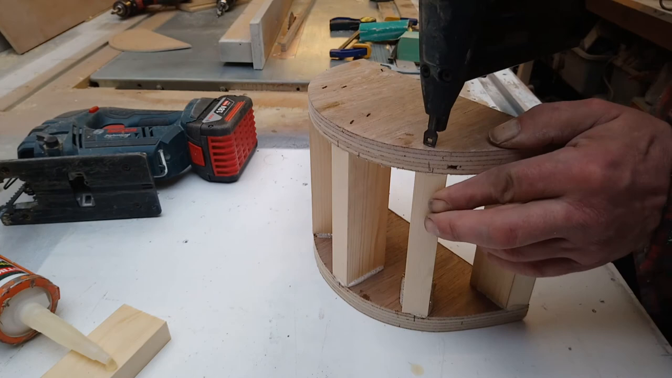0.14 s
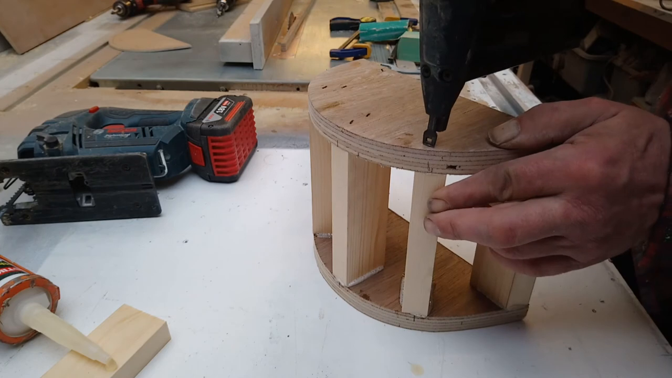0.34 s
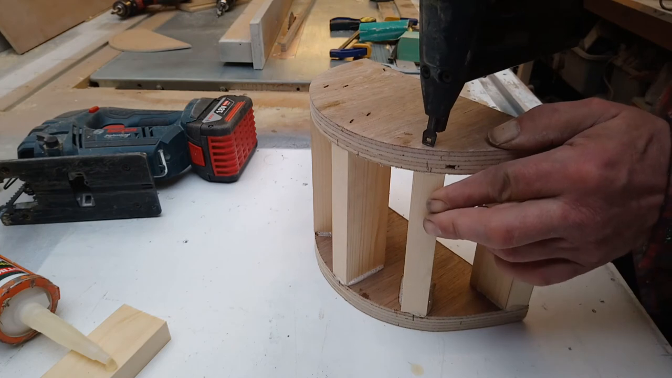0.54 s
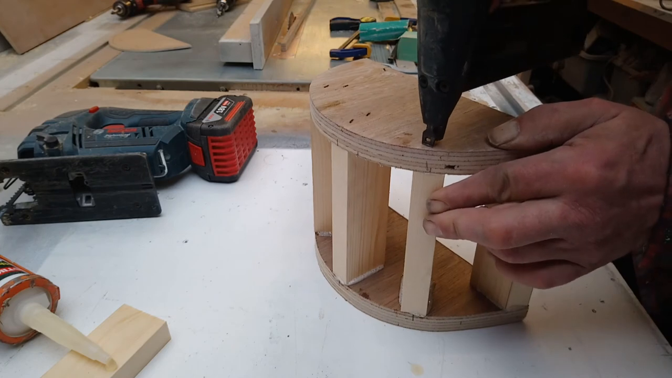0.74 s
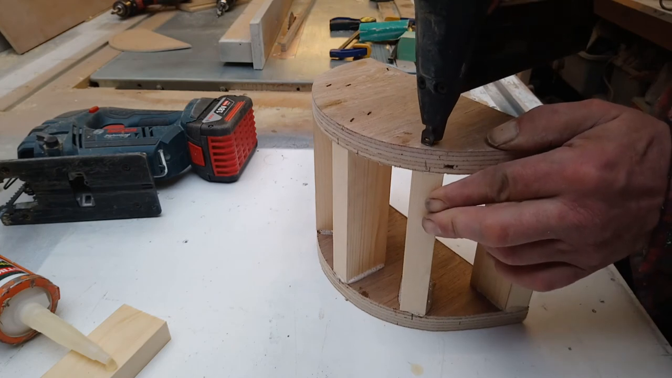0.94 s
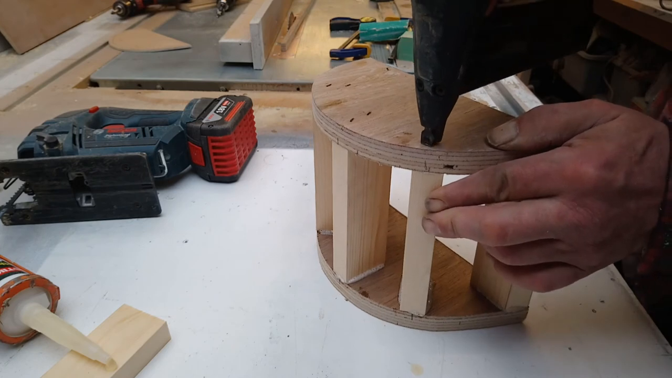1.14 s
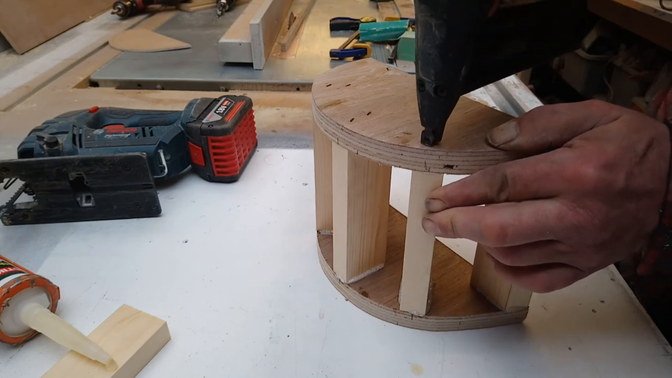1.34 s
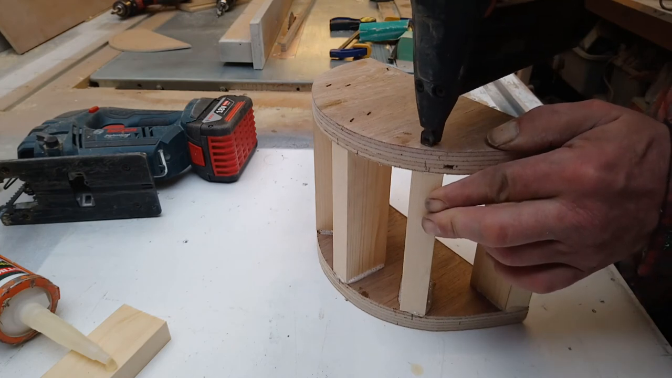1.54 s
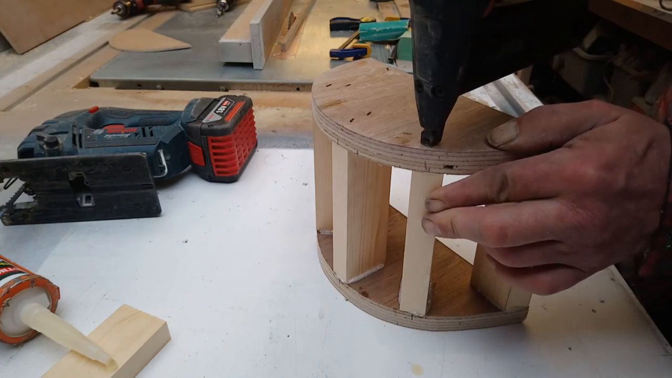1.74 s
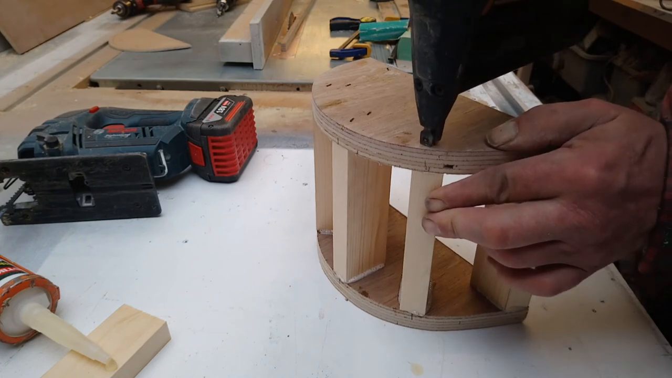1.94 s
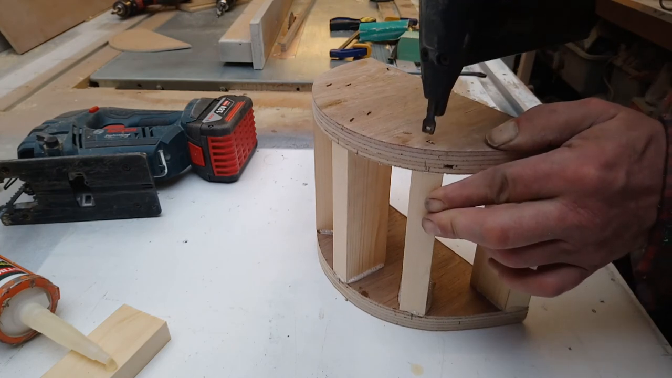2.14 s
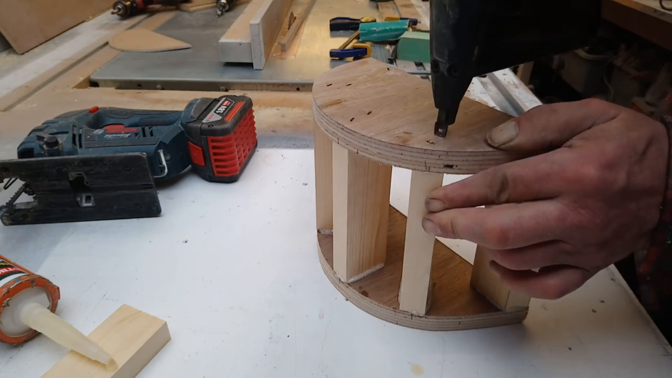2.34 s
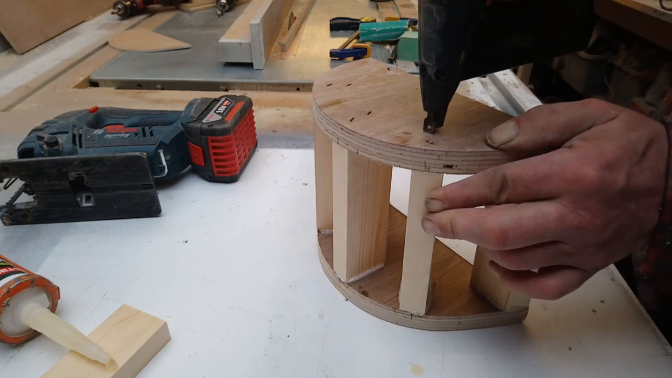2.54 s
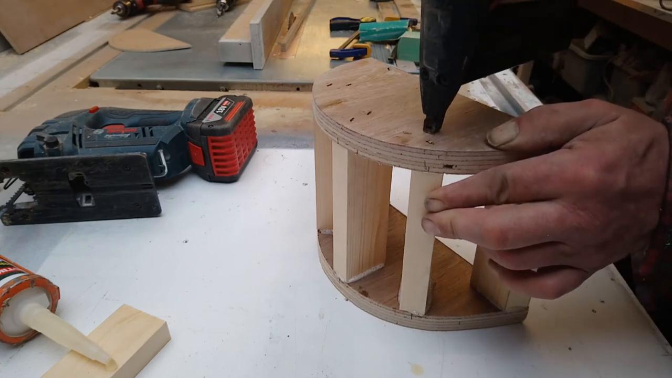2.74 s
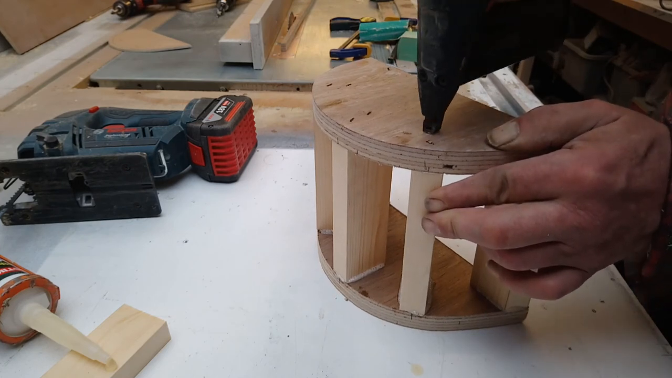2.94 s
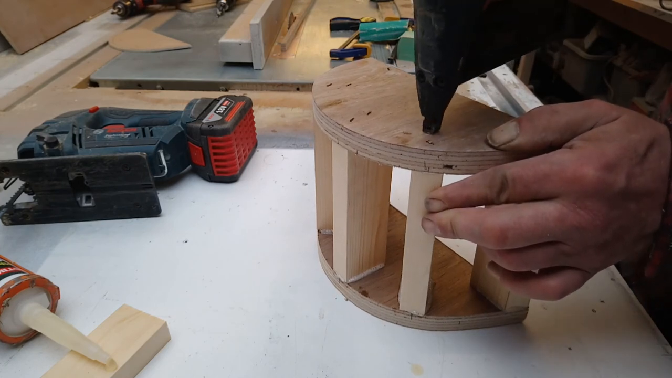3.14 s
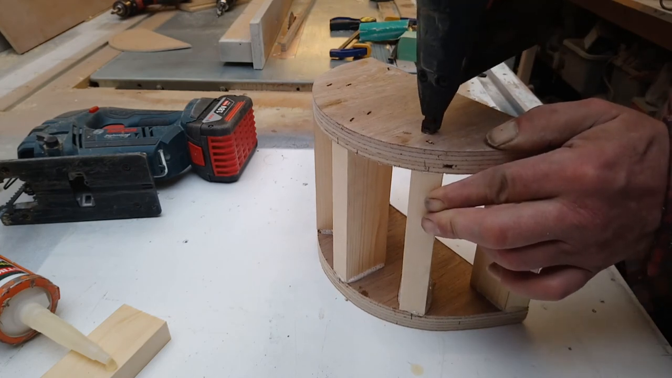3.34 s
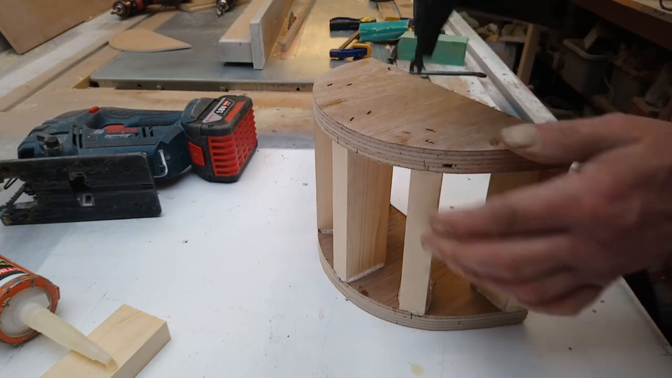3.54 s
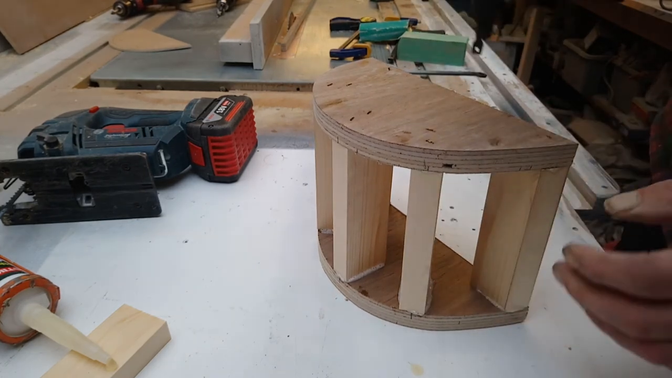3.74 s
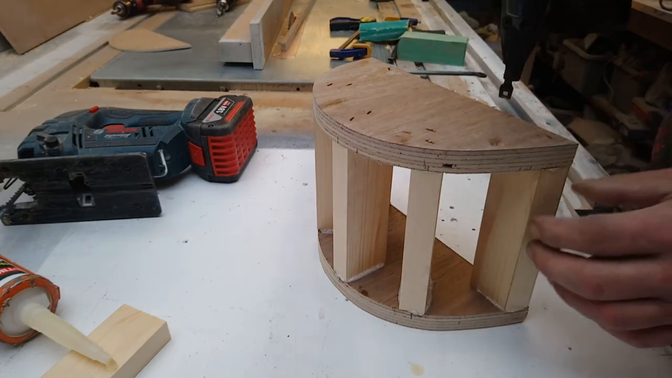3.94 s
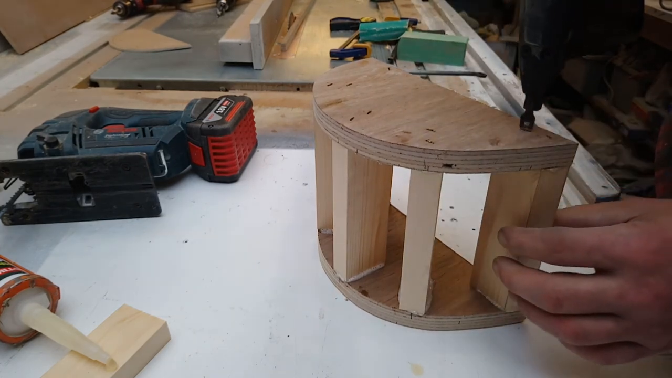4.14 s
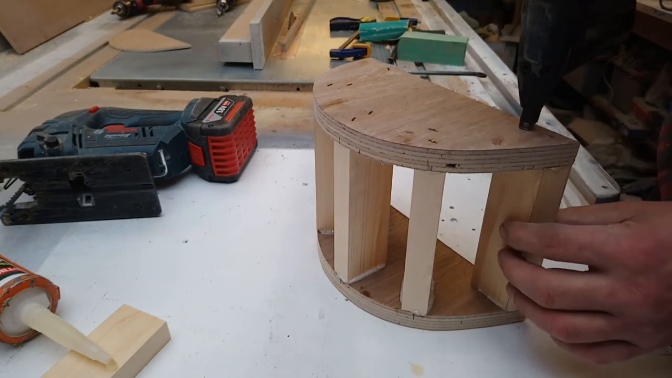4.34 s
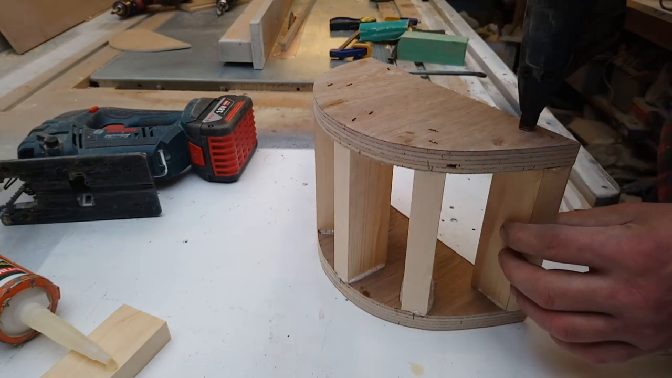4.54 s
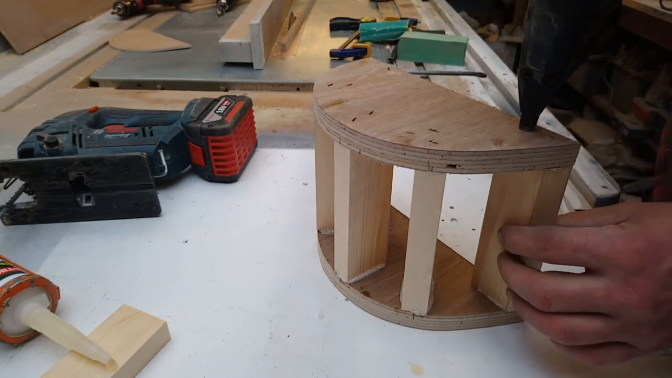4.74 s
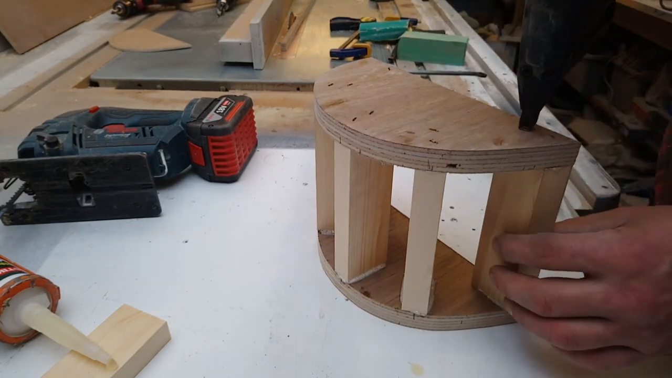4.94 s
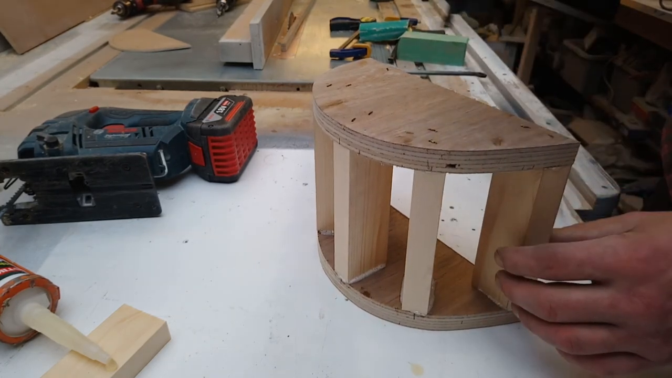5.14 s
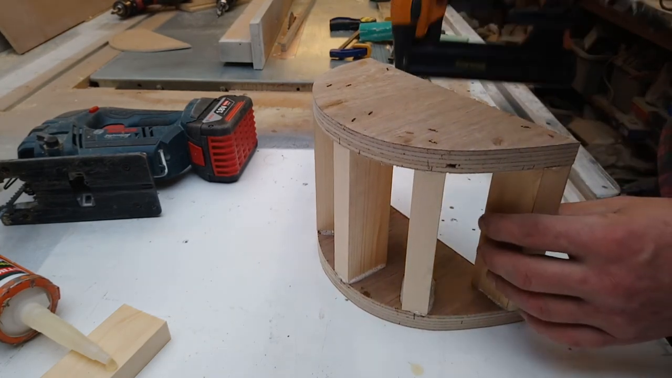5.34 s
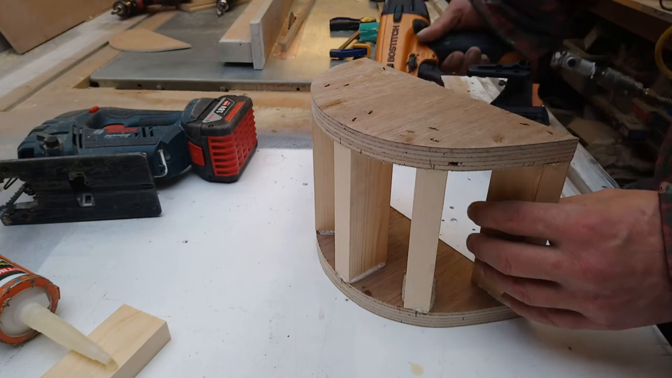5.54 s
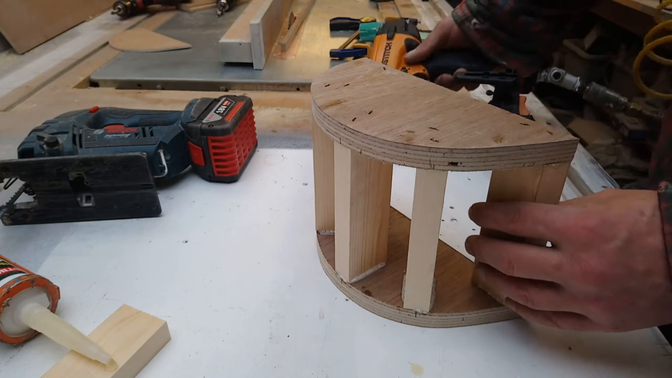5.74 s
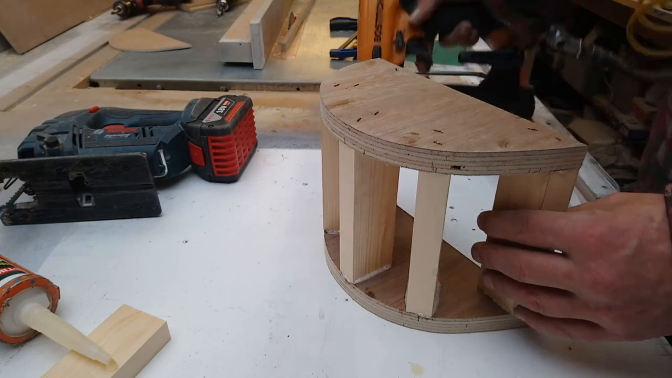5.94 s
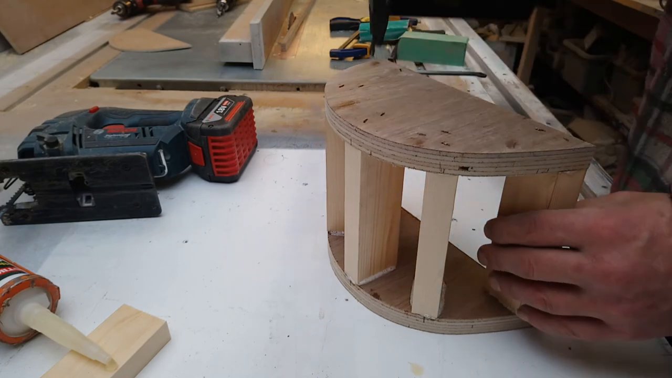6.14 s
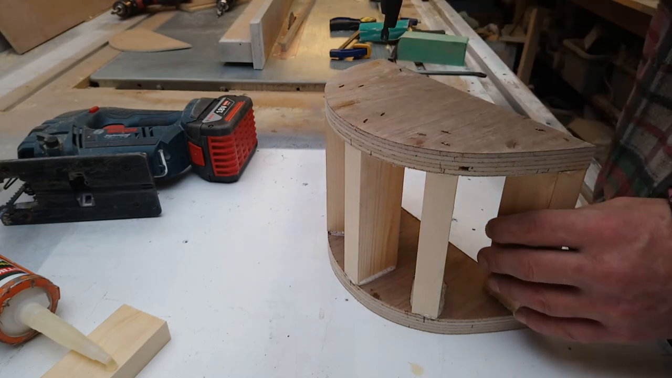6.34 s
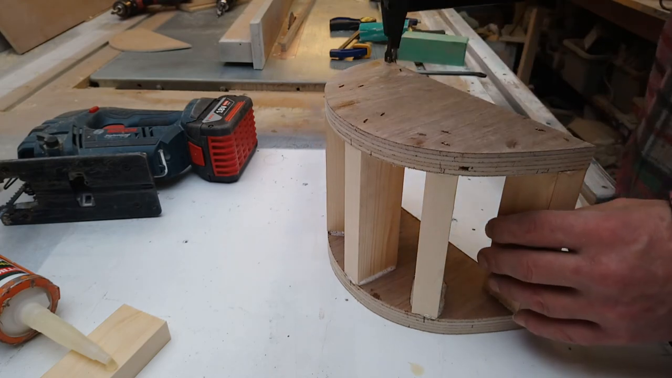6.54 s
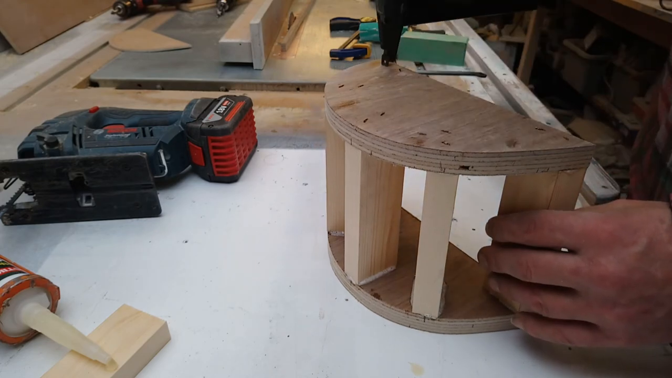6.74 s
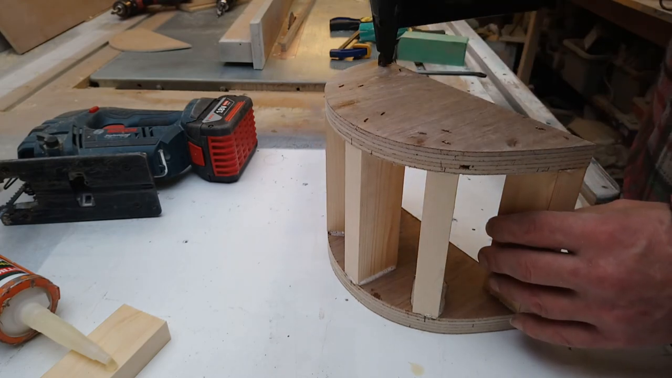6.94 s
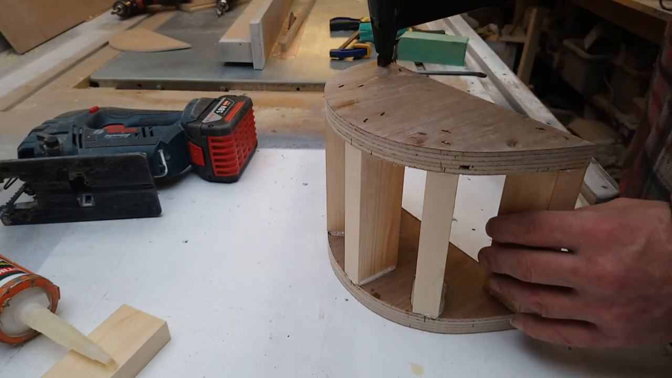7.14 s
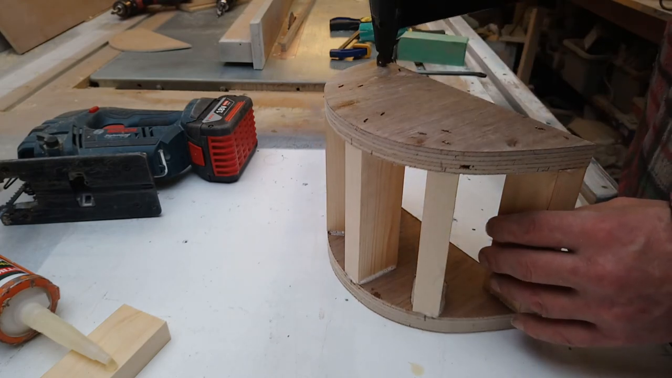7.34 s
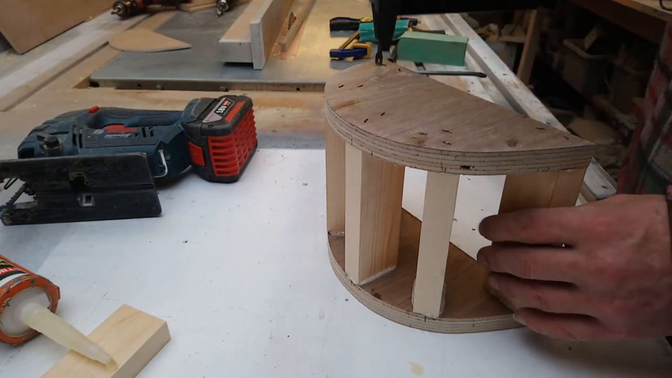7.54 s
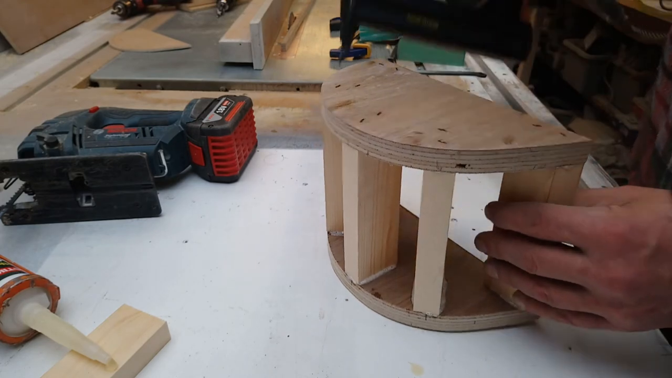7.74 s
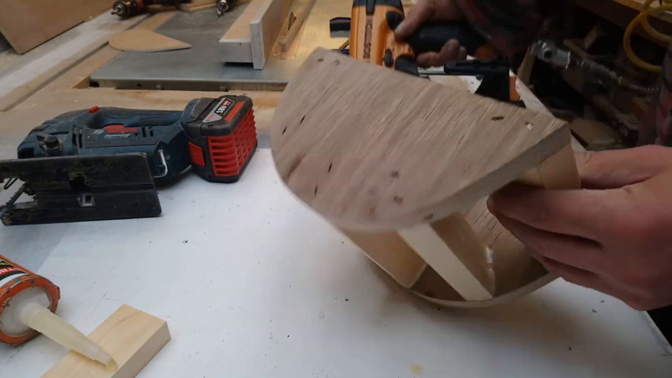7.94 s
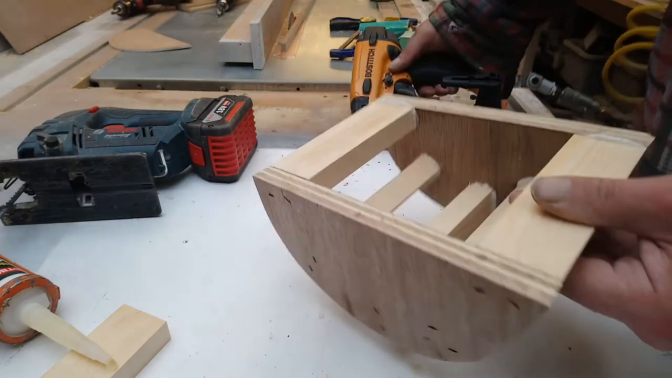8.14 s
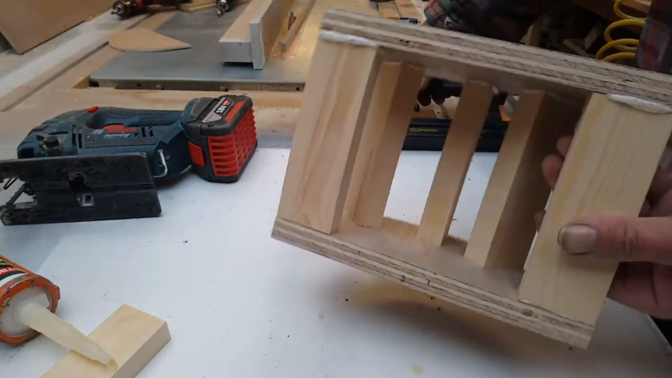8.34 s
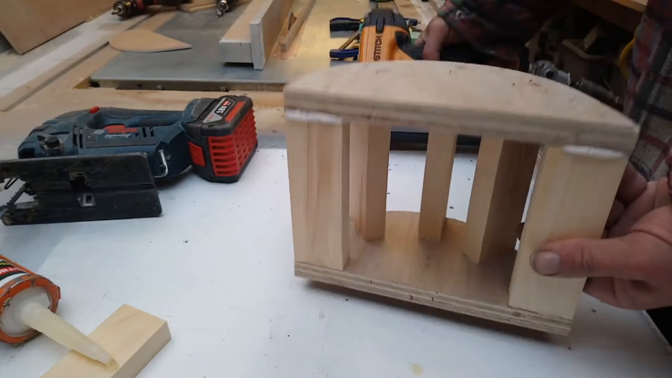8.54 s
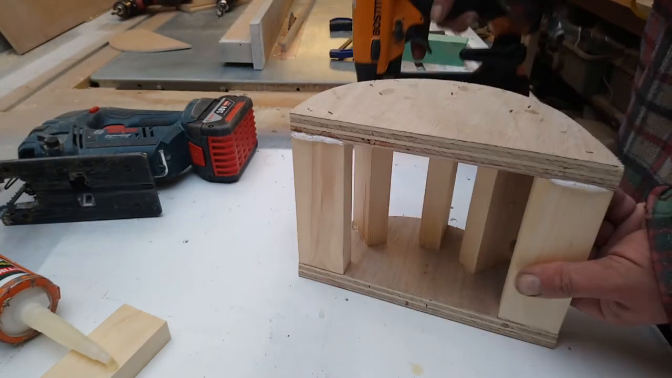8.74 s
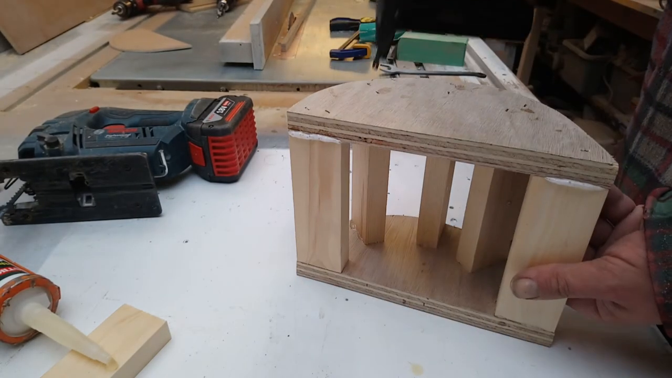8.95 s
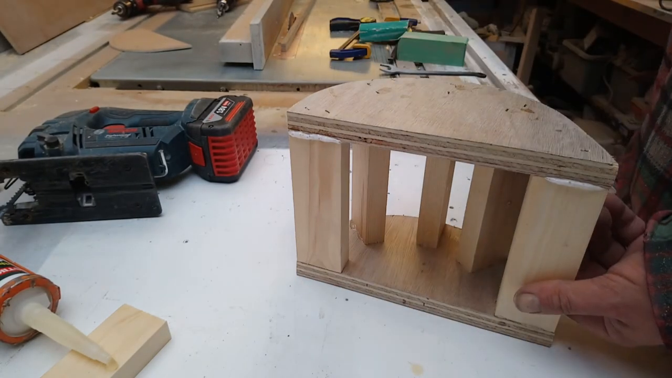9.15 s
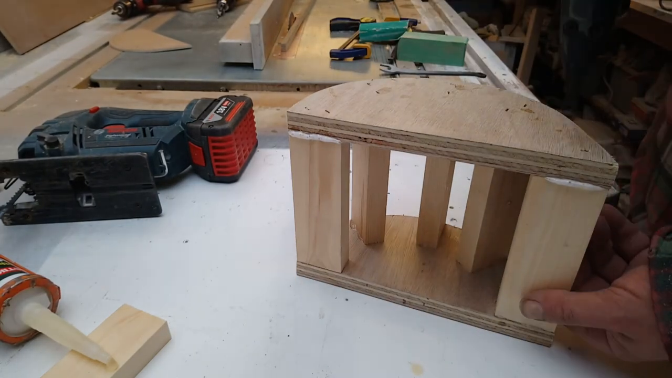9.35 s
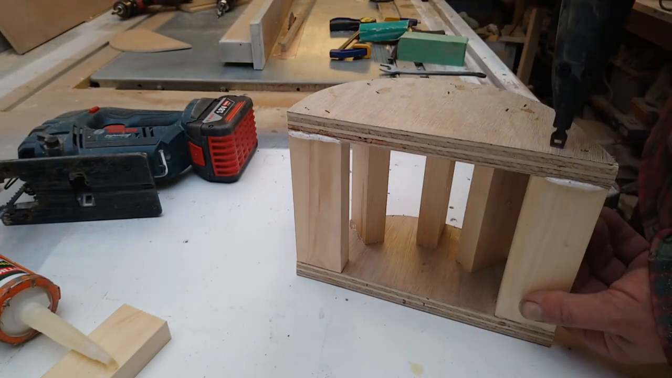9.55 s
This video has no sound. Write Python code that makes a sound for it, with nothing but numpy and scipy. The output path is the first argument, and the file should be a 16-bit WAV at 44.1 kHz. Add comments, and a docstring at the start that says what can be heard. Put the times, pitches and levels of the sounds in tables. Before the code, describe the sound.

In a small workshop, four punchy stapler blasts each snap back with a short air hiss, while the wooden form is handled and set down.

```python
"""Four loud shots of an air staple gun into a plywood and timber form on a workbench in a small workshop.
Shot: damped air pulse, noise bursts for the driver's blow, form and gun modes; a limiter ducks the level.
Return: the piston slaps back (short pulse, noise) and the exhaust hisses until the cylinder is empty.
Between shots the gun clicks and clacks; the form is knocked, scraped, rocked and set down (noise, modes).
Steady air noise and faint hand rustle lie below. Table levels are relative dB."""
import sys
import numpy as np
from scipy import signal
from scipy.fft import rfft, irfft, next_fast_len
from scipy.io import wavfile
from scipy.ndimage import uniform_filter1d, minimum_filter1d

SR = 44100
rng = np.random.default_rng(int(sys.argv[2]) if len(sys.argv) > 2 else 0)


def output_pcm(signal):
    """Save a mono or channel-first signal as 16-bit PCM at the path in sys.argv[1].

    Samples are clipped to [-1, 1] before scaling.
    """
    pcm = np.clip(np.atleast_2d(signal).T, -1, 1) * 32767
    wavfile.write(sys.argv[1], SR, np.round(pcm).astype(np.int16))


N = 422908
TIME = np.arange(N) / SR
AGE = np.arange(int(.8 * SR)) / SR   # s since onset


def from_db(db):
    """Decibels to gain."""
    return 10 ** (np.asarray(db) / 20)


def rms_one(x):
    """Scale to rms 1."""
    return x / np.sqrt(np.mean(x ** 2) + 1e-20)


def at_hz(points, hz):
    """Interpolate a table on a log-frequency axis."""
    f, value = np.transpose(points)
    return np.interp(np.log(np.maximum(hz, 1)), np.log(f), value)


def noise(spectrum, size=len(AGE)):
    """Gaussian noise shaped by a spectrum, rms 1."""
    n = next_fast_len(size)
    gain = from_db(at_hz(spectrum, np.fft.rfftfreq(n, 1 / SR)))
    white = rfft(rng.standard_normal(n))
    return rms_one(irfft(white * gain, n)[:size])


def fade(t60_s, age=AGE):
    """Exponential decay, -60 dB at t60."""
    return np.exp(-np.log(1000) * age / t60_s)


def attack(rise_s):
    """Exponential approach to full level."""
    return 1 - np.exp(-AGE / rise_s)


def burst(spectrum, t60_s, rise_s):
    """Many close, heavily damped modes set off together, as decaying noise."""
    return noise(spectrum) * fade(t60_s) * attack(rise_s)


def ring(modes, spread_db):
    """Struck modes: decaying sines, new strength and phase at every blow."""
    hz, db, t60_s = np.transpose(modes)[:, :, None]
    strength = from_db(db + spread_db * rng.standard_normal(hz.shape))
    phase = rng.random(hz.shape)   # cycles
    waves = strength * np.sin(2 * np.pi * (hz * AGE + phase)) * fade(t60_s)
    return waves.sum(0) * attack(0.00015)


def pop(hz, length_s):
    """Pressure pulse: a few cycles, then cut off."""
    return np.sin(2 * np.pi * hz * AGE) * np.exp(-np.minimum(AGE / length_s, 2) ** 6)


def swell(start_s, length_s):
    """Speed of a hand movement: half-sine arch from rest to rest."""
    return np.sin(np.pi * np.clip((TIME - start_s) / length_s, 0, 1))


def waver(rate_hz):
    """Random values from -1.12 to 1 at a given rate, joined by straight lines."""
    knots = rng.uniform(-1.12, 1, N)
    return np.interp(TIME * rate_hz, np.arange(N), knots)


def add(track, start_s, sound):
    """Mix a sound into a track at a time."""
    i = max(int(round(start_s * SR)), 0)
    track[i:i + len(sound)] += sound[:max(N - i, 0)]


# shots: t/s, air pulse level/dB, blow level/dB, form ring level/dB
SHOT_EVENTS = [(1.7800, 12, 7, 1.5), (3.1840, 13, 7, 3.5), (4.7752, 9, 3.5, -3.5), (7.2876, 5.5, 2.5, -14)]
# driver blow spectrum: f/Hz, level/dB
BLOW_SPECTRUM = [(40, -32), (80, -8), (140, 6.5), (250, 8), (500, 2), (1000, 0.5), (1600, -1.5), (2500, 1),
                 (4000, -2.5), (6500, -1), (10000, -8.5), (16000, -11.5)]
# gun body modes: f/Hz, level/dB, t60/s
GUN_MODES = [(1304, -11, 0.11), (1571, -9, 0.13), (1983, 6.5, 0.033), (2498, 6.5, 0.058),
             (2873, 2.5, 0.086), (2910, -9.5, .1), (3300, -15, .15), (3700, -18.5, .1), (4360, -18, .09),
             (4640, -6, .09), (5190, -1, 0.052), (6100, -10, 0.088)]
# wooden form modes: f/Hz, level/dB, t60/s
FORM_MODES = [(143, -10, 0.22), (186.8, -6, 0.39), (231.6, -6.5, 0.32), (291, 1, 0.093), (332, -6, 0.26),
              (353, 3.5, 0.32), (423, -5, 0.27), (480, -34, .13), (576, -5, 0.11), (801, -21, 0.19),
              (1085, -25, 0.11), (1090, -22, .15), (1491, -15.5, .14)]
RECOIL_RISE_S, RECOIL_T60_S = 0.0029, 0.054


def shots(pulse_hz, pulse_s, blow_lag_s, crack_db, peak_db, shake_db, form_db, gun_db, push_db, push_hz,
          trigger_db):
    """Air slams the piston down; the driver hits home and shakes the form. Gives (pulses, ringing)."""
    pulses, body = np.zeros(N), np.zeros(N)
    valve = [(4000, -17.0), (6700, -1), (9000, -20.5)]   # f/Hz, level/dB
    for t, pulse_db, blow_db, ring_db in SHOT_EVENTS:
        hit = t + blow_lag_s
        add(pulses, t - .010, from_db(trigger_db) * burst(valve, t60_s=0.019, rise_s=0.00041))
        add(pulses, t, from_db(pulse_db) * pop(pulse_hz, pulse_s))
        add(body, t, from_db(blow_db + crack_db) * burst(BLOW_SPECTRUM, t60_s=0.13, rise_s=0.000087))
        add(body, hit, from_db(blow_db + peak_db) * burst(BLOW_SPECTRUM, t60_s=0.019, rise_s=0.0021))
        add(body, hit, from_db(blow_db + shake_db) * burst(BLOW_SPECTRUM, t60_s=0.12, rise_s=0.00034))
        add(body, hit, from_db(blow_db + gun_db) * ring(GUN_MODES, spread_db=3.0))
        add(pulses, t, from_db(ring_db + form_db) * ring(FORM_MODES, spread_db=2.5))
        # recoil shoves form and bench: one heavily damped swing
        push = np.sin(2 * np.pi * push_hz * AGE) * fade(RECOIL_T60_S) * attack(RECOIL_RISE_S)
        add(body, t, from_db(ring_db + push_db) * push)
    return pulses, body


# trigger let go, piston returns: t/s, slap level/dB, slap f/Hz, exhaust level/dB
RETURN_EVENTS = [(1.9342, 13, 2220, -4.5), (3.3355, 8.5, 2064, -5.5), (4.9070, 6, 2094, -8),
                 (7.4250, 6.5, 2350, -8.5)]
# piston slap spectrum: f/Hz, level/dB
SLAP_SPECTRUM = [(100, -7), (400, 4.5), (1000, 4.5), (1500, 7), (2100, 9.5), (2600, 13), (3400, -12),
                 (5000, 4), (7000, -3.5), (16000, -25)]
# exhaust hiss spectrum: f/Hz, level/dB
EXHAUST_SPECTRUM = [(200, -2), (700, -30), (1400, 3.5), (2200, 4), (3300, 5.5), (5000, 6), (6500, 12),
                    (7500, 10), (10000, 4), (15000, 3)]
# small steel contact spectrum: f/Hz, level/dB
CLICK_SPECTRUM = [(300, -10), (1000, 8.5), (2000, 0), (3500, -0.5), (5500, 1), (7000, 4.5), (10000, -7),
                  (16000, -11.5)]
# body and magazine clack spectrum: f/Hz, level/dB
CLACK_SPECTRUM = [(200, 3), (500, 7), (900, 3.5), (1400, -5.5), (2800, 5.5), (4500, -1.5), (6500, -4),
                  (10000, -13), (16000, -21)]
EXHAUST_S = 0.17   # centre of the closing slope as the cylinder empties


def returns(slap_s, clatter_db, bounce_lag_s, bounce_db, vent_t60_s, close_s):
    """The piston slaps its stop and bounces; the cylinder vents until empty. Gives (pulses, ringing)."""
    pulses, body = np.zeros(N), np.zeros(N)
    for t, slap_db, hz, exhaust_db in RETURN_EVENTS:
        add(pulses, t, from_db(slap_db) * pop(hz, slap_s))
        add(body, t, from_db(slap_db + 1.5) * burst(CLICK_SPECTRUM, t60_s=0.01, rise_s=0.00067))
        add(body, t, from_db(slap_db + clatter_db) * burst(SLAP_SPECTRUM, t60_s=0.12, rise_s=0.0005))
        bounce = burst(CLACK_SPECTRUM, t60_s=0.0048, rise_s=0.00022)
        add(body, t + bounce_lag_s, from_db(slap_db + bounce_db) * bounce)
        emptying = (1 - np.tanh((AGE - EXHAUST_S) / close_s)) / 2
        hiss = burst(EXHAUST_SPECTRUM, t60_s=vent_t60_s, rise_s=0.0098)
        add(body, t, from_db(exhaust_db) * hiss * emptying)
    return pulses, body


# light clicks of the gun's safety: t/s, level/dB, ring f/Hz, ring level above tick/dB
SAFETY_CLICKS = [(0.943, -37, 5660, 15), (2.1861, -22.5, 4520, 4), (2.4398, -28.5, 5740, -4),
                 (2.6522, -37, 6000, 10), (2.7104, -35.5, 2900, 3.5), (2.981, -30.5, 2436, -10),
                 (4.513, -42, 6650, 14.5), (7.152, -34.5, 2550, -1), (7.7045, -32.5, 6600, 3),
                 (8.0725, -30.5, 3300, -10)]
# gun nose set on the plywood: t/s, steel tick level/dB, wood knock level/dB
NOSE_TOUCHES = [(0.6822, -35.5, -48), (2.3224, -35.5, -33.5), (4.142, -22, -33), (4.3251, -29, -35.5),
                (6.546, -19.5, -31), (6.7228, -30.5, -51), (6.789, -33.5, -35), (7.199, -33, -38),
                (9.521, -23, -30)]
# steel nose modes: f/Hz, level/dB, t60/s
NOSE_MODES = [(1800, -12, 0.12), (2840, 1, 0.026), (3450, 0.5, 0.043), (4200, -8, 0.077), (4630, -2, 0.098),
              (5120, 0.5, 0.044), (6450, -4, 0.084)]
# gun body and magazine clacks: t/s, level/dB, ring level/dB, air spit level/dB
BODY_CLACKS = [(1.9810, -21, -43, -41), (5.4370, -17, -23, -50), (5.4950, -31.5, -38, -58),
               (5.5548, -37, -57, -57), (5.8532, -35.5, -66, -27), (7.4725, -20.5, -40, -31),
               (7.9066, -16.5, -21, -38), (8.1460, -22, -36, -15)]
MAGAZINE_RATTLE_S, MAGAZINE_LOSS_DB = 0.015, 8.5   # per repeat strike on the body


def gun_handling(click_db, tick_t60_s, ring_db, ring_t60_s, nose_db, rattle_db, rattle_lag_s, spit_t60_s):
    """Small steel parts tick and rattle; harder jolts ring the gun's body and let out a spit of air."""
    out = np.zeros(N)

    def tick(t, db, ringing):
        """A steel contact with its ring, then a weaker rattle."""
        contact = burst(CLICK_SPECTRUM, t60_s=tick_t60_s, rise_s=0.00067)
        add(out, t, from_db(db + click_db) * (contact + ringing))
        rattle = burst(CLICK_SPECTRUM, t60_s=0.082, rise_s=.0005)
        add(out, t + rattle_lag_s * rng.uniform(0.37, 1.3), from_db(db + rattle_db) * rattle)

    for t, db, hz, share_db in SAFETY_CLICKS:
        steel = [(hz * 0.19, -30), (hz * 0.76, -9), (hz, 0), (hz * 1.16, -9), (hz * 2, -24)]
        tick(t, db, from_db(share_db + ring_db) * burst(steel, t60_s=ring_t60_s, rise_s=0.00033))
    for t, db, _ in NOSE_TOUCHES:
        tick(t, db, from_db(nose_db) * ring(NOSE_MODES, spread_db=-4.0))
    for t, db, body_db, air_db in BODY_CLACKS:
        add(out, t, from_db(db) * burst(CLACK_SPECTRUM, t60_s=0.18, rise_s=0.00086))
        for k in range(3):
            strike = from_db(body_db - k * MAGAZINE_LOSS_DB) * ring(GUN_MODES, spread_db=1.5)
            add(out, t + k * MAGAZINE_RATTLE_S, strike)
        add(out, t, from_db(air_db) * burst(EXHAUST_SPECTRUM, t60_s=spit_t60_s, rise_s=0.00142))
    return out


# hands shift their grip: t/s, length/s, low shuffle level/dB, sleeve rustle level/dB
GRIP_MOVES = [(0.85, 0.39, -42.5, -74), (2.3, 0.45, -37, -42), (3.55, 0.64, -44, -53),
              (5.138, 0.42, -41.5, -50), (5.973, 0.29, -49, -47), (6.59, 0.25, -51, -45),
              (7.64, 0.33, -33.5, -41.5), (8.239, 0.16, -46, -46.5), (9.159, 0.31, -39.5, -52)]
LOOSE_TICKS_PER_S, LOOSE_TICK_DB = 2.6, -33.5   # rate at full hand speed


def loose_parts():
    """Loose gun parts tick at random while the hands move, more often at higher hand speed."""
    moving = sum(swell(t, length_s) for t, length_s, _, _ in GRIP_MOVES)
    happens = rng.random(N) < moving * LOOSE_TICKS_PER_S / SR
    jolts = happens * rng.uniform(0.46, 1, N)
    tick = burst(CLICK_SPECTRUM, t60_s=0.027, rise_s=.0004)
    return from_db(LOOSE_TICK_DB) * signal.fftconvolve(jolts, tick)[:N]


# form knocked or set down: t/s, level/dB, bright edge level/dB
FORM_KNOCKS = [(0.044, -40, 0), (1.192, -36, 1), (1.365, -38.5, 0), (5.436, -21, 3), (7.903, -21, 1.5),
               (8.135, -14, -4.5), (8.5653, -3, -9.5), (8.636, -16, -24), (8.656, -9, -15),
               (8.676, -17, -13)]
# form rocks on the bench: t/s, first thud level/dB, loss per thud/dB
FORM_ROCKS = [(0.684, -26, 10), (1.183, -31.5, 12), (2.652, -29.5, 5), (4.331, -21, 3), (5.457, -21.5, 1.5),
              (6.727, -26, 9), (6.923, -23.5, 8.5), (7.933, -22, 8), (8.133, -11.5, 13.5),
              (8.566, -18, 0.5), (8.673, -15, 11)]
# wood contact spectrum: f/Hz, level/dB
WOOD_SPECTRUM = [(60, -6), (130, -7.5), (190, 10.5), (260, -7), (400, 0.5), (600, 0), (1000, -19.5),
                 (2000, -23), (4000, -42.5), (10000, -57)]
# bright edge of a wood contact: f/Hz, level/dB
WOOD_EDGE_SPECTRUM = [(200, -6.5), (700, 10.5), (1400, 3), (2500, -3.5), (5000, -15.5), (12000, -36)]
# bench thud and hand shuffle spectrum: f/Hz, level/dB
BENCH_SPECTRUM = [(20, -19), (35, -19), (52, -1), (80, 1.5), (120, -2.5), (180, 0.5), (260, -10.5),
                  (450, -18.5), (1200, -45.5)]
TOUCH_EDGE_DB, TOUCH_THUD_DB = 3.5, -4   # re knock
REBOUND_S, REBOUND_LOSS_DB = 0.018, 5   # per rebound, two per form knock
ROCK_S = 0.056   # thud to thud


def form_handling(knock_db, ring_db, bump_db):
    """Wood meets the gun's nose or the bench, which answers with a low thud; the form chatters and rocks."""
    out = np.zeros(N)

    def knock(t, db, edge_db):
        """A hard contact that rings the form."""
        edge = burst(WOOD_EDGE_SPECTRUM, t60_s=0.063, rise_s=0.00081)
        contact = burst(WOOD_SPECTRUM, t60_s=0.085, rise_s=0.00077) + from_db(edge_db) * edge
        ringing = from_db(ring_db) * ring(FORM_MODES, spread_db=4.0)
        add(out, t, from_db(db) * (from_db(knock_db) * contact + ringing))

    def thud(t, db):
        """A soft push into the bench."""
        add(out, t, from_db(db + bump_db) * burst(BENCH_SPECTRUM, t60_s=0.18, rise_s=0.0069))

    for t, _, db in NOSE_TOUCHES:
        knock(t, db, TOUCH_EDGE_DB)
        thud(t, db + TOUCH_THUD_DB)
    for t, db, edge_db in FORM_KNOCKS:
        for k in range(3):
            knock(t + k * REBOUND_S, db - k * REBOUND_LOSS_DB, edge_db)
    for t, db, loss_db in FORM_ROCKS:
        for k in range(4):
            thud(t + k * ROCK_S, db - k * loss_db)
    return out


# wood slides on the bench or under the gun's nose: t/s, length/s, level/dB, centre f/Hz
WOOD_SCRAPES = [(6.646, 0.1, -41.5, 352), (7.755, 0.16, -40.5, 560), (8.642, 0.097, -24.5, 476)]


def scrapes(slips_per_s):
    """Wood sticks and slips; every slip is a tiny damped knock."""
    out = np.zeros(N)
    for t, length_s, db, hz in WOOD_SCRAPES:
        age = AGE[:int(length_s * SR)]
        happens = rng.random(len(age)) < slips_per_s / SR
        slips = happens * rng.standard_normal(len(age))
        spectrum = [(hz / 4, -14), (hz, 0), (hz * 4, -20), (hz * 10, -45), (hz * 20, -70)]
        knock = burst(spectrum, t60_s=0.019, rise_s=.001)
        grain = rms_one(signal.fftconvolve(slips, knock)[:len(age)])
        arch = np.sqrt(np.abs(np.sin(np.pi * age / length_s)))
        add(out, t, from_db(db) * grain * arch)
    return out


# diffuse reflections: f/Hz, t60/s
ROOM_DECAY = [(60, 0.8), (180, 1.43), (300, 0.88), (600, 0.45), (2000, 0.1), (6000, 0.42), (15000, 0.07)]
# diffuse reflections: f/Hz, level/dB
ROOM_LEVEL = [(60, -6), (180, -10), (400, -12), (1000, -10), (3000, -9.5), (7000, -20), (15000, -15)]


def workshop(x, build_up_s):
    """Diffuse reflections as noise that dies band by band, slowest around 180 Hz."""
    age, response = np.arange(int(SR * 1.5)) / SR, 0
    edges_hz = np.geomspace(35, 17000, 19)
    for low, high in zip(edges_hz, edges_hz[1:]):
        hz = np.sqrt(low * high)
        band_pass = signal.butter(2, [low, high], "band", fs=SR, output="sos")
        band = signal.sosfilt(band_pass, rng.standard_normal(len(age)))
        onset = 1 - np.exp(-(age / build_up_s) ** 2)
        tail = band * fade(max(at_hz(ROOM_DECAY, hz), .01), age) * onset
        # energy in proportion to bandwidth
        share = np.sqrt(2 * (high - low) / SR / np.sum(tail ** 2))
        response = response + tail * from_db(at_hz(ROOM_LEVEL, hz)) * share
    return signal.fftconvolve(x, response)[:N]


# workshop standing waves: f/Hz, level/dB, t60/s
STANDING_WAVES = [(52.6, -6, 0.67), (74.2, 3.5, 0.3), (93.6, 3.5, 2.1), (121.8, 4.5, 0.39),
                  (146.7, 1.5, 0.29), (177.4, 3.5, 1.3), (188, -19, 1), (210, -1.5, 0.13), (250, -2.5, 1.2),
                  (298, 2.5, 0.43), (337, -1, 0.43), (356.7, -4, 0.36)]


def standing_waves(x):
    """Low room modes, two-pole resonators, boom after every thud; neighbours have opposite sign."""
    out = np.zeros(N)
    for k, (hz, db, t60_s) in enumerate(STANDING_WAVES):
        r = np.exp(-np.log(1000) / (t60_s * SR))
        poles = [1, -2 * r * np.cos(2 * np.pi * hz / SR), r * r]
        resonance = signal.lfilter([1 - r, 0, r - 1], poles, x + 1e-18)
        out += (-1) ** k * from_db(db) * resonance
    return out


# steady workshop air spectrum: f/Hz, level/dB
AIR_SPECTRUM = [(20, -2), (50, -25.5), (100, 4), (150, -1.5), (185, 16), (240, -1), (310, 1), (420, -11),
                (700, -3.5), (1300, 3), (2500, -15.5), (6500, -16), (10000, -23), (16000, -17)]
# sleeve rustle spectrum: f/Hz, level/dB
RUSTLE_SPECTRUM = [(200, -12.5), (500, 3.5), (1200, -1.5), (2800, 1), (4500, -5), (6500, -6),
                   (10000, -13.5), (16000, -37.5)]


def background(air_db, resting_shuffle_db, resting_rustle_db, shuffle_db, rustle_db, flicker_db):
    """Steady air noise; hands and sleeves rub faintly all the time, louder with each change of grip."""
    low, high = from_db(resting_shuffle_db), from_db(resting_rustle_db)
    for t, length_s, low_db, high_db in GRIP_MOVES:
        speed = swell(t, length_s)
        low = np.hypot(low, speed * from_db(low_db + shuffle_db))
        high = np.hypot(high, speed * from_db(high_db + rustle_db))
    catching_db = flicker_db * (waver(rate_hz=22) + waver(rate_hz=160))
    rustle = high * from_db(catching_db) * noise(RUSTLE_SPECTRUM, size=N)
    shuffle = low * noise(BENCH_SPECTRUM, size=N)
    return from_db(air_db) * noise(AIR_SPECTRUM, size=N) + shuffle + rustle


def scene():
    """Gun and form close to the microphone, inside the workshop."""
    fire, blow = shots(pulse_hz=983, pulse_s=0.0022, blow_lag_s=.0105, crack_db=-4.0, peak_db=7.0,
                       shake_db=-2.5, form_db=-12.5, gun_db=-26.0, push_db=1, push_hz=146.0, trigger_db=-28)
    slap, vent = returns(slap_s=0.0025, clatter_db=-9.5, bounce_lag_s=0.017, bounce_db=-3.5,
                         vent_t60_s=0.39, close_s=0.024)
    pulses = fire + slap
    gun = gun_handling(click_db=-1.5, tick_t60_s=0.031, ring_db=-2.0, ring_t60_s=0.026, nose_db=-13,
                       rattle_db=-11, rattle_lag_s=0.018, spit_t60_s=0.15)
    form = form_handling(knock_db=-5, ring_db=-12.5, bump_db=-1.5)
    ringing = blow + vent + gun + loose_parts() + form + scrapes(slips_per_s=370)
    # pulses beam towards the microphone, so less of them reaches the walls
    sent = ringing + from_db(-3.0) * pulses
    room = workshop(sent, build_up_s=0.002) + from_db(1.5) * standing_waves(sent)
    floor = background(air_db=-51.5, resting_shuffle_db=-59, resting_rustle_db=-52.0, shuffle_db=-3.5,
                       rustle_db=-6.5, flicker_db=5.0)
    return (pulses + ringing + room + floor)[None]


# microphone colour: f/Hz, level/dB
MIC_COLOUR = [(20, -1), (6000, -2), (6800, -6.5), (7800, -16), (9500, -18), (13500, -19), (14500, -10.5),
              (15400, -8), (16000, -15.5)]


def microphone(x):
    """Minimum-phase filter with the microphone's colour, from a folded cepstrum."""
    size = 2048
    colour = from_db(at_hz(MIC_COLOUR, np.fft.rfftfreq(size, 1 / SR)))
    cepstrum = irfft(np.log(colour))
    folded = np.r_[cepstrum[0], 2 * cepstrum[1:size // 2]]
    response = irfft(np.exp(rfft(folded, size)))
    return signal.fftconvolve(x, response)[:N]


def limiter(x, ceiling_db, ahead_s, hold_s, release_db_per_s):
    """Gain drops just before a peak, waits, then climbs back and lifts the ringing tail."""
    over_db = np.maximum(20 * np.log10(np.abs(x) + 1e-9) - ceiling_db, 0)
    width = int((ahead_s + hold_s) * SR)
    held_db = -minimum_filter1d(-over_db, width)   # running maximum
    held_db = np.interp(TIME - (hold_s - ahead_s) / 2, TIME, held_db)
    slope_db = release_db_per_s * TIME
    cut_db = np.maximum.accumulate(held_db + slope_db) - slope_db
    return x * from_db(-uniform_filter1d(cut_db, size=128))


CUTOFF_HZ = 16100


def record(dry):
    """Microphone colour, limiter, overload clipping, steep top cut."""
    limited = limiter(microphone(dry[0]), ceiling_db=2.0, ahead_s=0.0077, hold_s=0.035,
                      release_db_per_s=130.0)
    top_cut = signal.ellip(10, .2, 70, CUTOFF_HZ, fs=SR, output="sos")
    return signal.sosfilt(top_cut, np.clip(limited, -1, 1))[None]


dry = scene()
out = record(dry)
output_pcm(out)
```